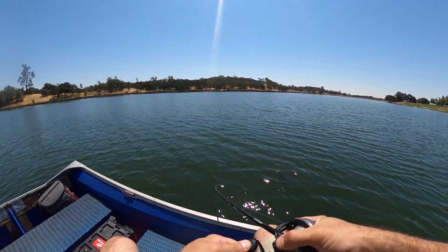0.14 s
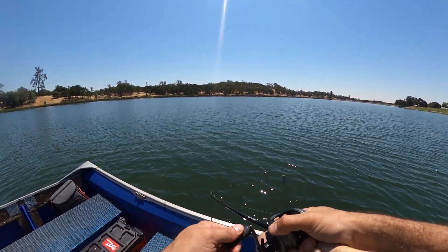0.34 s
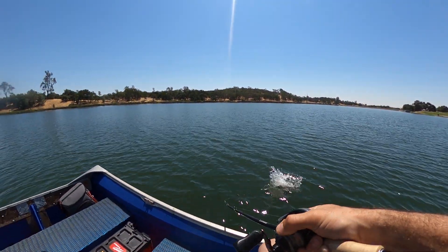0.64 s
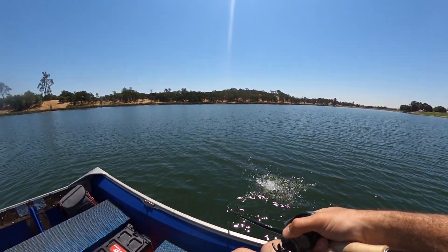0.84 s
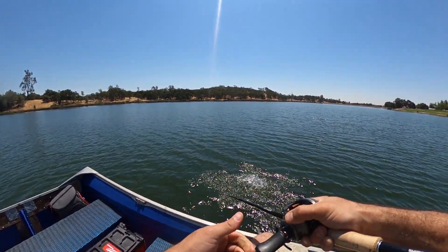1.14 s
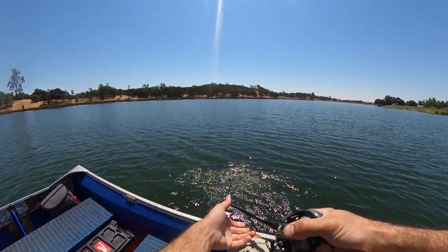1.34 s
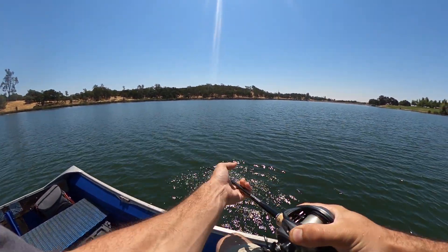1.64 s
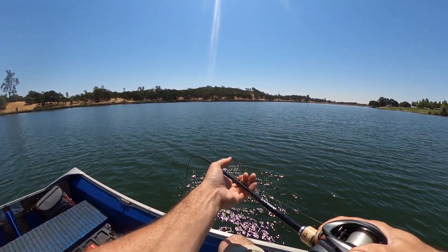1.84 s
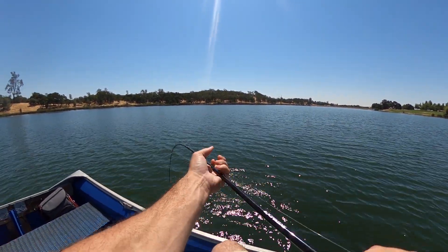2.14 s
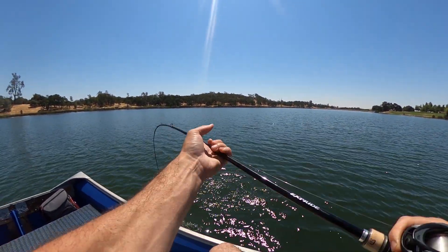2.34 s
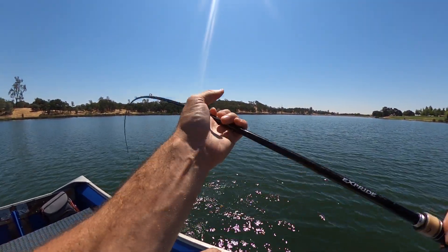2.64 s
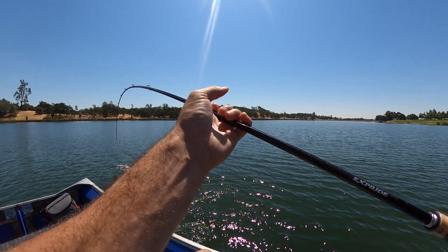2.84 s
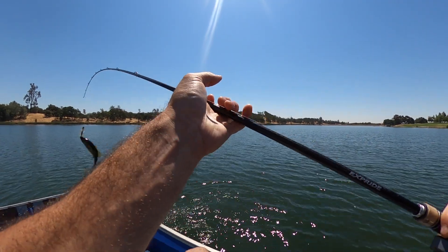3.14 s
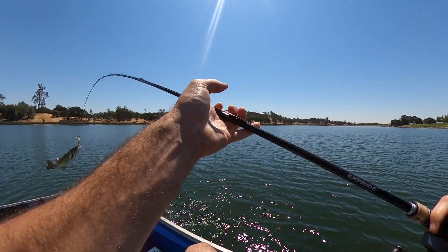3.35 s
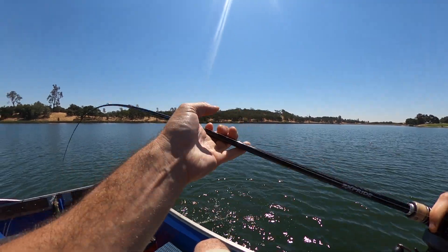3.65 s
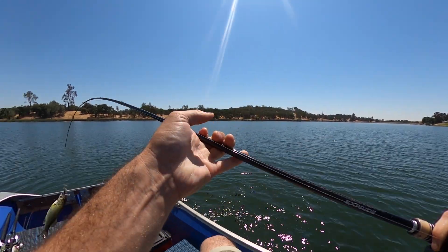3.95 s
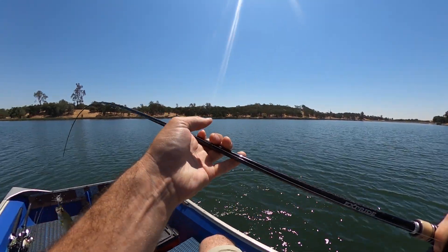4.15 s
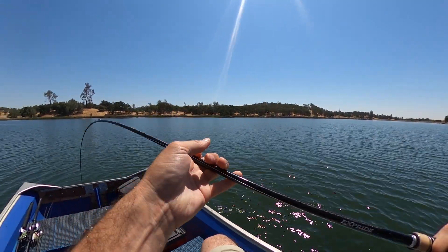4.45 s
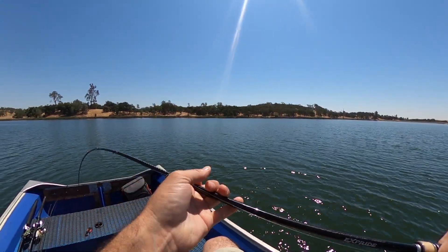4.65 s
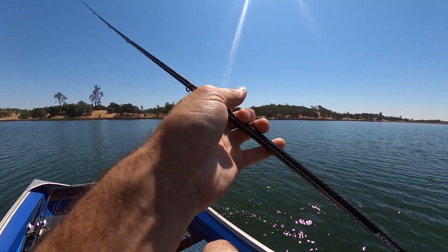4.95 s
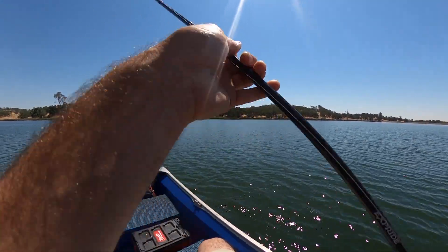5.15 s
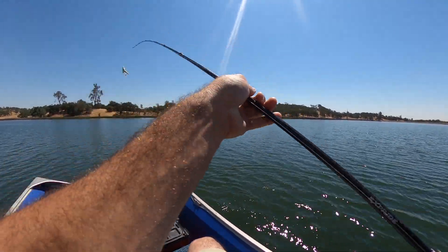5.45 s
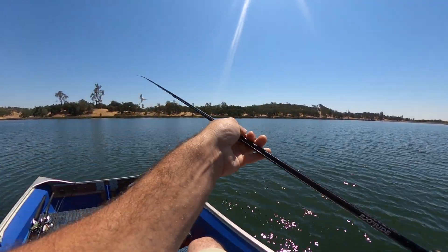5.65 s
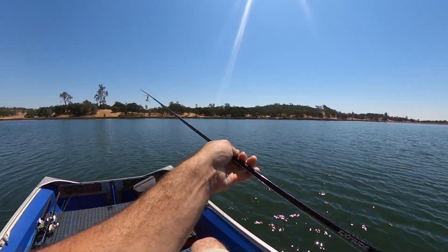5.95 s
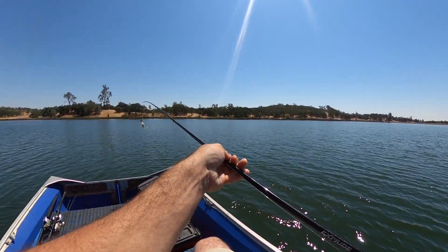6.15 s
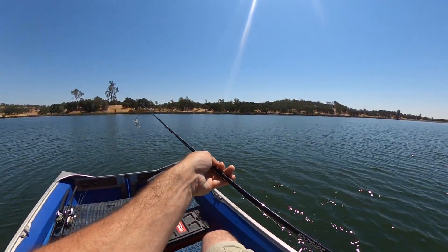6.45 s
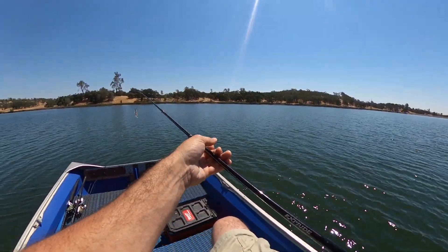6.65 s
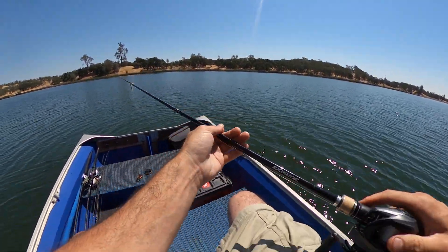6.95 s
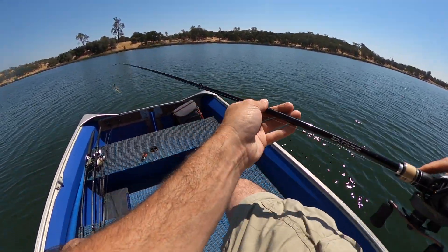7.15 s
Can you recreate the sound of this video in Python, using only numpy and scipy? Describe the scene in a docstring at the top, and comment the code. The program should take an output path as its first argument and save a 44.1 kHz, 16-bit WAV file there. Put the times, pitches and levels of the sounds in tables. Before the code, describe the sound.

A light wind rumbles under a faint hiss throughout, heard close up from a small aluminium boat on a pond. From the start, a fish splashes beside the hull, strongest between 0.5 and 1.2 seconds, with hollow plops and small spatters ticking on the metal. Softer swirls and plops continue until about 4.3 seconds. A few tiny drips fall around 2.3 to 2.5 seconds, and a lure tinkles faintly near 2.9 seconds. At 4.5 seconds the fish begins flopping on the boat's floor: the hull booms, its panels ring and wet skin slaps, loudest at about 4.7 seconds. The lure gives thin, high clinks again around 5 seconds. More thumps land near 5.1 and 5.6 seconds, followed by a quick, uneven run of knocks and slaps from 6 seconds until the end at about 7.3 seconds.

```python
"""An angler lifts a fish out of a pond into a small aluminium boat. A light wind rumbles under a faint
hiss while the fish splashes beside the hull: air pockets plop and water spatters the plating. Drops fall
from the fish, each trapping a bubble, and the lure tinkles. From 4.5 s the fish flops on the floor: the
hull booms, its panels ring and wet skin slaps."""
import sys
import numpy as np
from scipy import signal
from scipy.fft import rfft, irfft
from scipy.io import wavfile
from scipy.ndimage import uniform_filter1d

SR = 44100
rng = np.random.default_rng(int(sys.argv[2]) if len(sys.argv) > 2 else 0)


def unload_wav(signal):
    """Save mono or channel-first audio to the path in sys.argv[1] as 16-bit WAV at rate SR, clipped to [-1, 1]."""
    wavfile.write(
        sys.argv[1],
        SR,
        np.round(np.clip(np.atleast_2d(signal).T, -1, 1) * 32767).astype(np.int16),
    )


N = 321909


def gain_of(db):
    """Decibels to amplitude."""
    return 10 ** (np.asarray(db) / 20)


def unit_rms(x):
    """Scales to rms 1."""
    return x / np.sqrt(np.mean(x ** 2) + 1e-20)


def unit_peak(x):
    """Scales to peak 1."""
    return x / abs(x).max()


def add(mix, start_s, sound):
    """Mixes a sound in at a time."""
    part = mix[max(round(start_s * SR), 0):][:len(sound)]
    part += sound[:len(part)]


def attack(t, rise_s):
    """A fade-in that eases from 0 toward 1."""
    return 1 - np.exp(-t / rise_s)


def fader(points):
    """A gain curve through (time_s, level_db) points."""
    return gain_of(np.interp(np.arange(N) / SR, *np.transpose(points)))


def eq_db(eq, hz):
    """Reads an EQ curve on a log-frequency axis."""
    freq_hz, level_db = np.transpose(eq)
    return np.interp(np.log(hz + 1), np.log(freq_hz + 1), level_db)


def equalised(x, eq):
    """Filters by an EQ curve and scales to rms 1."""
    hz = np.fft.rfftfreq(len(x), 1 / SR)
    return unit_rms(irfft(rfft(x) * gain_of(eq_db(eq, hz)), len(x)))


def ringing(t, hz, db, t60, phase=0):
    """A sum of dying sines; phase is in cycles."""
    return (gain_of(db - 60 * t / t60) * np.sin(2 * np.pi * (hz * t + phase))).sum(0)


def restless_noise(eq, size, patch_db, flicker_db):
    """Coloured noise: patches of its spectrum drift in level while the whole of it flickers."""
    frames, hz = 4 * N // size + 5, np.fft.rfftfreq(size, 1 / SR)
    real, imag, patches = rng.standard_normal((frames, len(hz), 3)).T
    patches = unit_rms(uniform_filter1d(uniform_filter1d(patches, size=5, axis=0), size=8, axis=1))
    flicker = unit_rms(uniform_filter1d(rng.standard_normal(frames), size=4))
    level_db = eq_db(eq, hz)[:, None] + patch_db * patches + flicker_db * flicker
    spectra = (real + 1j * imag) * gain_of(level_db)
    return unit_rms(signal.istft(spectra, nperseg=size, noverlap=3 * size // 4)[1][:N])


# Deep wind rumble: freq_hz, level_db
WIND_EQ = [(7.1, -24.5), (12, 12), (58, 0), (119, -7.5), (156, 2.5), (205, -14.5), (236, -14), (487, -28.5),
           (639, -69.5), (900, -57.5), (1980, -120)]
# Level of the wind rumble, which swells, sinks and dips during the loud flops: time_s, level_db
WIND_RIDE = [(0, -43.5), (.8, -43.5), (1.45, -43.5), (1.55, -46.5), (2.0, -41.5), (2.55, -45.5),
             (2.95, -46), (3.2, -51.5), (3.7, -50), (4.1, -49), (4.45, -45.5), (4.7, -50.5), (5.3, -55),
             (6.0, -47.5), (7.3, -50.5)]


def wind():
    """A light wind rumbles; its level swells and sinks."""
    return fader(WIND_RIDE) * restless_noise(WIND_EQ, size=1024, patch_db=1.8, flicker_db=1.2)


# Airy background, scooped near 1 kHz: freq_hz, level_db
HISS_EQ = [(290, -20), (500, -9.5), (1090, -58.5), (1930, -15.5), (7130, -15.5), (15500, -57)]
# Fader ride on the hiss: time_s, level_db
HISS_RIDE = [(1.6, -77), (2.1, -87.5), (3.3, -78.5), (4.3, -82), (5.7, -85.5), (7.3, -82)]


def hiss():
    """A faint bed of hiss drifts in level."""
    return fader(HISS_RIDE) * restless_noise(HISS_EQ, size=512, patch_db=1.5, flicker_db=1.5)


def bubbles(low_hz, high_hz, per_s, decay_cycles, spread_db):
    """Bubbles ring as short rising tones, in a sparse random train at each of 16 pitches."""
    out = np.zeros(N)
    for hz in np.geomspace(low_hz, high_hz, num=16):
        cycles = np.arange(round(3 * decay_cycles / hz * SR)) / SR * hz
        envelope = np.exp(-cycles / decay_cycles) * (1 - np.exp(-cycles))
        tone = np.sin(2 * np.pi * (cycles + 0.0041 * cycles ** 2)) * envelope
        chance, size = rng.random((2, N))
        train = (chance < per_s / 16 / SR) * gain_of(-spread_db * np.log(size + 0.012))
        out += signal.oaconvolve(train, tone)[:N]
    return unit_rms(out)


# Bright top of a splash: freq_hz, level_db
SPRAY_EQ = [(530, -35), (900, 1), (1730, -9), (2200, -7), (4940, -10.5), (12500, -37.5), (15500, -57)]
# Hollow body of a splash: freq_hz, level_db
GURGLE_EQ = [(150, -18), (250, -16.5), (503, 8.5), (747, -7), (1290, -10), (1600, -11.5), (2080, -58.5)]
# Splashes and swirls: start_s, hold_s, spray_db, gurgle_db
SPLASHES = [(0.214, 0.016, -63, -68), (0.476, 0.065, -51, -56), (0.603, 0.063, -45.5, -42),
            (0.76, 0.1, -59.5, -49), (0.85, 0.018, -47, -54.5), (0.977, 0.0093, -48, -44.5),
            (1.072, 0.16, -53.5, -45.5), (1.343, 0.23, -70.5, -101), (2.276, 0.33, -62, -68),
            (2.765, 0.2, -58, -67.5), (3.405, 0.088, -74.5, -82), (3.62, 0.048, -64, -61.5),
            (3.866, 0.013, -65.5, -64), (4.248, 0.015, -78, -52), (7.035, 0.047, -71, -61)]


def splashing():
    """Over a steady trickle, each splash swells, holds and drains: spray on top, bubbles below."""
    rise_db_per_s, fall_db_per_s, trickle_db = 288, 156, -73.5
    spray = restless_noise(SPRAY_EQ, size=256, patch_db=3.0, flicker_db=2.5)
    droplets = equalised(bubbles(994, 5940, per_s=900, decay_cycles=3.8, spread_db=22.0), SPRAY_EQ)
    gurgle = restless_noise(GURGLE_EQ, size=512, patch_db=3.5, flicker_db=2.5)
    gurgle += 0.65 * bubbles(330, 1900, per_s=500, decay_cycles=5.5, spread_db=4.0)
    t = np.arange(0, N / SR, 0.002)
    gains = np.zeros((2, len(t)))
    for start_s, hold_s, *levels_db in SPLASHES:
        swell_db = rise_db_per_s * np.maximum(start_s - t, 0)
        drain_db = fall_db_per_s * np.maximum(t - start_s - hold_s, 0)
        gains += gain_of(np.c_[levels_db] - swell_db - drain_db)
    spray_gain, gurgle_gain = (np.interp(np.arange(N) / SR, t, gain) for gain in gains)
    gurgle_gain += gain_of(trickle_db)
    return spray_gain * unit_rms(spray + 0.22 * droplets) + gurgle_gain * unit_rms(gurgle)


# Air pockets and wavelets against the hull: start_s, level_db, pitch_hz, t60_s
PLOPS = [(0.024, -23.5, 285, 0.011), (0.308, -35, 234, 0.036), (0.523, -29.5, 544, 0.065),
         (0.637, -25, 575, 0.014), (0.675, -22.5, 492, 0.018), (0.801, -29, 381, 0.076),
         (0.877, -26.5, 600, 0.032), (1.015, -18.5, 627, 0.045), (1.046, -21, 490, 0.019),
         (1.086, -30, 516.4, 0.15), (1.139, -27.5, 346, 0.07), (1.586, -29.5, 594, 0.074),
         (1.75, -34, 311.7, 0.13), (1.903, -19, 243, 0.033), (2.012, -28.5, 414, 0.081),
         (2.044, -31, 516, 0.034), (2.179, -57.5, 744, 0.095), (2.274, -41.5, 753, 0.03),
         (2.321, -41, 543, 0.14), (2.458, -43, 401, 0.094), (2.517, -40.5, 735, 0.033),
         (2.542, -35.5, 376, 0.031), (2.733, -44, 417, 0.11), (2.842, -36, 319, 0.12),
         (2.995, -39, 236, 0.19), (3.177, -35, 254.7, 0.048), (3.618, -42, 225.6, 0.22),
         (3.899, -32, 296, 0.085), (3.918, -30, 306.6, 0.12), (4.051, -40, 541, 0.093),
         (4.224, -39.5, 315.6, 0.22), (5.748, -35.5, 484, 0.089)]


def plops():
    """A pocket of air gives a short tone; the plating around it answers with a longer cluster."""
    out, t = np.zeros(N), np.arange(SR // 3) / SR
    for start_s, level_db, pitch_hz, t60_s in PLOPS:
        pocket = np.sin(2 * np.pi * pitch_hz * t) * gain_of(-60 * t / t60_s)
        spread, phase = rng.random((2, 14, 1))
        octaves = 1.6 * spread - 0.8
        plating_t60_s = 2.77 * t60_s / 2 ** octaves  # high modes die first
        plating = ringing(t, pitch_hz * 2 ** octaves, -13 - 14 * abs(octaves), plating_t60_s, phase)
        add(out, start_s, gain_of(level_db) * (pocket + plating) * attack(t, 0.002))
    return out


# Mid-heavy smack of a wet hit: freq_hz, level_db
SLAP_EQ = [(590, -9), (1000, -6.5), (1550, -8), (1840, -12.5), (2560, -15), (4810, -21.5), (15500, -54)]
# Clank of thin plating: pitch_hz, level_db, t60_s
CLANK_MODES = [(1490, -0.5, 0.035), (2152, -6, 0.033), (2566, -2, 0.026), (3590, 5, 0.013),
               (5790, -0.5, .022)]


def wet_slaps(hits):
    """Each hit is a crackling puff of noise, with short metallic rings at the spot that is struck."""
    out, t = np.zeros(N), np.arange(8192) / SR
    mode_hz, mode_db, t60_s = np.transpose(CLANK_MODES)[:, :, None]
    for start_s, level_db, length_s, spot_hz in hits:
        noise, grain = rng.standard_normal((2, len(t)))
        crackle = gain_of(2.0 * unit_rms(uniform_filter1d(grain, size=90)))
        progress = t / np.clip(length_s, 0.003, 0.05)
        swell = progress ** 1.51 * np.exp(-progress ** 1.28)
        tail = 0.021 * np.tanh(progress) * np.exp(-t / 0.089)
        tilt_db_per_octave = 2.5 * np.log2(spot_hz / 2200)  # a hard spot slaps brighter
        eq = [(hz, db + tilt_db_per_octave * np.log2(hz / 2000)) for hz, db in SLAP_EQ]
        puff = unit_peak(equalised(noise * crackle * (swell + tail), eq))
        detune = 1 + 0.018 * rng.standard_normal(mode_hz.shape)
        pair_hz = spot_hz * np.c_[[0.96, 1.03]] * detune[:2]
        pair_db = -2 + 0.3 * (level_db + 26)  # only hard blows ring out the spot's own split pitch
        spot = ringing(t, pair_hz, pair_db, t60=0.024) * attack(t, 0.002)
        octaves_away = abs(np.log2(mode_hz / spot_hz))
        plating = ringing(t, mode_hz * detune, mode_db - 10 * octaves_away, t60_s) * attack(t, 0.0038)
        # the puff leads, so the metal answers as it peaks
        add(out, start_s - 0.9 * length_s, gain_of(level_db) * puff)
        add(out, start_s, gain_of(level_db) * (spot + plating))
    return out


# Light hits on the side of the hull: start_s, level_db, length_s, spot_hz
SPATTERS = [(0.168, -50.5, 0.0066, 2050), (0.27, -46, 0.0057, 2250), (0.596, -38, .008, 3500),
            (0.675, -37, 0.011, 3070), (0.97, -41, 0.0076, 3100), (1.905, -49, 0.0063, 1520),
            (2.871, -35.5, 0.013, 2560), (3.842, -44, 0.004, 2680), (4.225, -48, 0.016, 5790),
            (4.293, -50, 0.0045, 6740), (4.674, -33, 0.015, 1580), (4.897, -49.5, 0.032, 2610),
            (5.198, -46, 0.013, 3050), (5.24, -51.5, 0.041, 2590), (6.039, -52, .027, 1550),
            (6.143, -60, 0.0065, 2595), (6.66, -37.5, .012, 3300), (6.692, -36.5, 0.0076, 2530),
            (6.757, -55, 0.021, 1590)]


def spatters():
    """Water spatters and ticks on the plating, with no thump."""
    return wet_slaps(SPATTERS)


# Single drops off the fish: start_s, level_db, pitch_hz
DRIPS = [(2.288, -45, 1310), (2.364, -49, 3700), (2.398, -47, 3050), (2.437, -49, 1470), (2.454, -49, 3220),
         (2.535, -49, 2120)]


def drips():
    """Each drop traps a bubble: a brief tone that rises."""
    out, t = np.zeros(N), np.arange(2048) / SR
    envelope = gain_of(-60 * t / 0.023) * attack(t, 0.0012)
    for start_s, level_db, pitch_hz in DRIPS:
        tone = np.sin(2 * np.pi * pitch_hz * (t + 3.3 * t ** 2))
        add(out, start_s, gain_of(level_db) * tone * envelope)
    return out


# Thin, high ring of the lure: pitch_hz, level_db, t60_s
LURE_MODES = [(10300, -17, .012), (12300, -8, .016), (14550, -10, .02)]
# Touches of its metal parts: start_s, level_db
TINKLES = [(2.738, -56), (2.788, -60), (2.871, -47), (2.924, -55), (2.9776, -58), (4.775, -59),
           (4.852, -61), (4.87, -67), (4.949, -58.5), (4.984, -68), (5.012, -56.5), (5.028, -39),
           (5.067, -66), (5.078, -60), (5.288, -68), (5.3205, -75), (5.343, -52)]


def lure_tinkles():
    """Small metal parts touch: a click, a faint rattle and a new blend of the lure's modes."""
    out, t = np.zeros(N), np.arange(4096) / SR
    mode_hz, mode_db, t60_s = np.transpose(LURE_MODES)[:, :, None]
    highpass = signal.butter(1, 4500, "high", fs=SR, output="sos")
    click_envelope = np.exp(-t / 0.002) + 0.09 * np.exp(-t / 0.02)
    for start_s, level_db in TINKLES:
        blend, detune = rng.standard_normal((2, len(LURE_MODES), 1))
        click = signal.sosfilt(highpass, rng.standard_normal(len(t)) * click_envelope)
        rings = ringing(t, mode_hz * (1 + 0.008 * detune), mode_db + 3 * blend, t60_s)
        add(out, start_s, gain_of(level_db) * (rings + 0.7 * click) * attack(t, 0.0012))
    return out


# Boom of the whole hull flexing: pitch_hz, level_db, t60_s
BOOM_MODES = [(120, -3, 0.057), (96.1, 6, 0.057), (77, -9.5, 0.11)]
# Floor panels below 300 Hz, upper ring above: pitch_hz, level_db, t60_s
HULL_MODES = [(167.9, 5.5, 0.13), (201.6, 3.5, 0.11), (274, -11, 0.21), (326, -4, 0.066), (399, 1.5, 0.059),
              (469.2, -6.5, 0.2), (546.4, -2, 0.099), (660, -1, 0.055), (806, -7.5, 0.038),
              (1015, -10.5, 0.04)]
# The fish hits the floor: start_s, boom_db, panel_db, ring_db, slap_db, length_s, spot_hz
FLOPS = [(4.538, -9, -8, -10.5, -25.5, 0.011, 3690), (4.618, -15, -22, -8, -26, 0.024, 2100),
         (4.647, -33, -40, -27, -40, 0.021, 1580), (4.699, 0.5, -7, -5.5, -22.5, 0.006, 2360),
         (4.72, -39, -13, -7.5, -23.5, 0.017, 2650), (4.761, -28, -39, -21, -38, 0.017, 1530),
         (4.825, -31, -24, -15, -34.5, 0.015, 1595), (4.857, -21, -33, -38, -53, 0.019, 1560),
         (5.109, -6.5, -10.5, -20.5, -29, 0.014, 1510), (5.153, -18.5, -26, -33, -38.5, 0.0096, 3070),
         (5.424, -28, -32, -30.5, -45.5, 0.02, 2530), (5.519, -31, -39, -37, -45, 0.047, 2120),
         (5.589, -3.5, -16, -18, -30, 0.014, 3000), (5.628, -20.5, -19.5, -33.5, -46, 0.012, 1575),
         (6.007, -12, -28.5, -39, -46, 0.023, 1560), (6.11, -20.5, -43.5, -52, -52.5, 0.016, 1540),
         (6.164, -15, -32, -56, -57, 0.02, 2750), (6.204, -5, -26.5, -38.5, -44.5, 0.012, 1560),
         (6.249, -38, -50.5, -55.5, -52, 0.017, 2170), (6.304, -36.5, -29, -43.5, -46, 0.008, 5510),
         (6.466, -11, -19, -22, -47.5, 0.013, 1550), (6.505, -24.5, -21, -54, -75, 0.017, 1560),
         (6.623, -10, -13.5, -18, -43.5, 0.02, 1585), (6.634, -41, -46, -22, -36, 0.01, 2290),
         (6.674, -33, -16.5, -15.5, -32, 0.0068, 2300), (6.837, -13.5, -15, -17.5, -27.5, 0.013, 2100),
         (6.878, -20, -29.5, -39, -36.5, 0.014, 1620), (6.941, -22, -35.5, -35, -40.5, 0.02, 2380),
         (7.137, -19.5, -36.5, -38, -51, 0.029, 1560), (7.208, -6, -17, -22.5, -35, 0.021, 3290),
         (7.234, -19, -19, -33, -51, 0.012, 3100)]


def fish_flops():
    """The soft body lands: boom and panels swell, an uneven roll shakes the upper modes, skin slaps."""
    hull, t = np.zeros(N), np.arange(SR // 4) / SR
    hz, db, t60_s = np.transpose(HULL_MODES)[:, :, None]
    flex_hz, flex_db, flex_t60_s = np.transpose(BOOM_MODES)[:, :, None]
    low = hz[:, 0] < 300
    roll_envelope = np.exp(-t[:2048] / 0.02) * attack(t[:2048], 0.00044)
    for start_s, boom_db, panel_db, ring_db, _, length_s, _ in FLOPS:
        stretch = length_s / 0.016  # the t60s hold for a 16 ms blow; a quicker one rings shorter
        detune = rng.uniform(-1.29, 1, hz.shape)
        boom_hz = flex_hz * (1 + 0.022 * detune[-len(BOOM_MODES):])
        boom = ringing(t, boom_hz, boom_db + flex_db, flex_t60_s * stretch) * attack(t, 0.008)
        panel_hz = (hz * (1 + 0.04 * detune))[low]
        panels = ringing(t, panel_hz, panel_db + db[low], t60_s[low] * stretch) * attack(t, 0.0058)
        roll = uniform_filter1d(rng.standard_normal(2048), size=22) * roll_envelope
        split_hz = hz * (1 + 0.085 * rng.uniform(-1.06, 1, (4,) + hz.shape))
        upper = sum(ringing(t, f[~low], db[~low], t60_s[~low] * np.sqrt(stretch)) for f in split_hz)
        ring = gain_of(ring_db) * unit_peak(signal.fftconvolve(upper, roll)[:len(t)])
        add(hull, start_s, ring - boom - panels)
    # the water under the hull smears every blow into a longer, rougher, duller hum
    smear = uniform_filter1d(rng.standard_normal(len(t)), size=40)
    smear *= gain_of(-60 * t / 0.37) * attack(t, 0.0051)
    hum = gain_of(-24.5) * signal.oaconvolve(hull, smear / np.linalg.norm(smear))[:N]
    low_cut = signal.butter(4, 62, "high", fs=SR, output="sos")
    skin = wet_slaps([(flop[0], *flop[4:]) for flop in FLOPS])
    return signal.sosfilt(low_cut, hull + hum) + skin


def scene():
    """A mono mix: wind and hiss under the water, the lure and the fish."""
    bed = wind() + hiss()
    water = splashing() + plops() + spatters() + drips()
    return (bed + water + lure_tinkles() + fish_flops())[None]


def record(dry):
    """Soft saturation lifts the level and rounds the loudest peaks; a low-pass cuts at 15.6 kHz."""
    rounded = np.tanh(dry / 0.75)
    lowpass = signal.firwin(511, 15600, window=("kaiser", 9), fs=SR)
    return signal.oaconvolve(rounded, lowpass[None], "same")


dry = scene()
out = record(dry)
unload_wav(out)
```